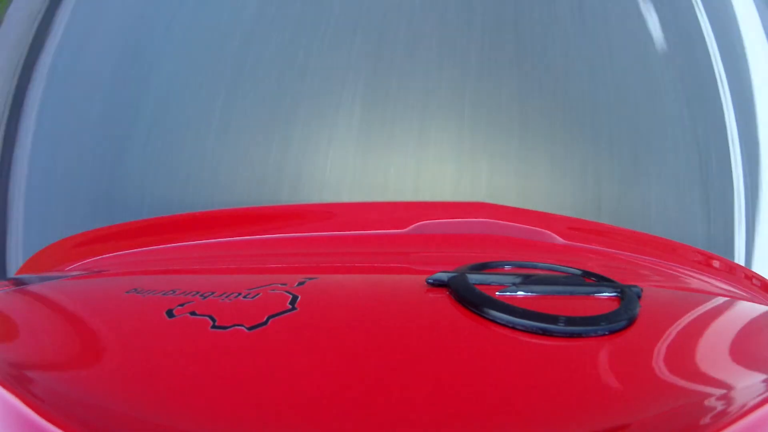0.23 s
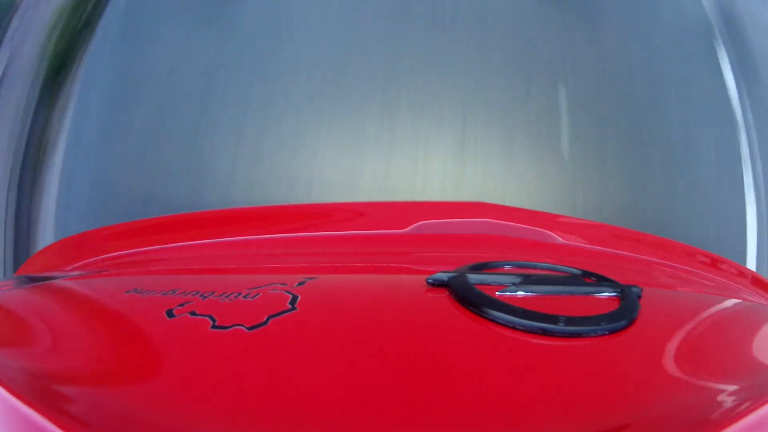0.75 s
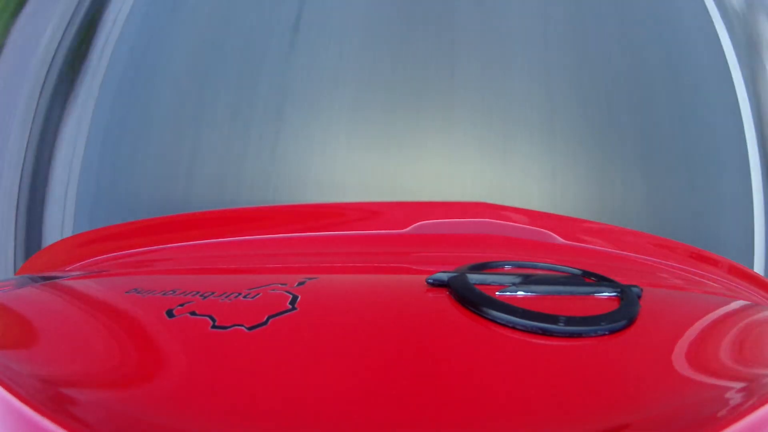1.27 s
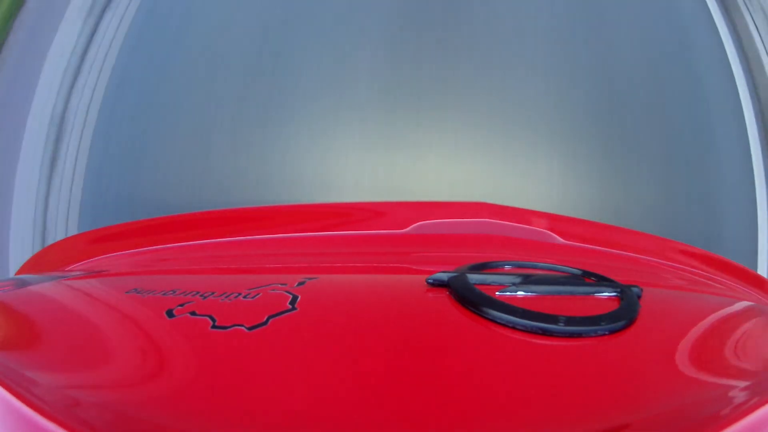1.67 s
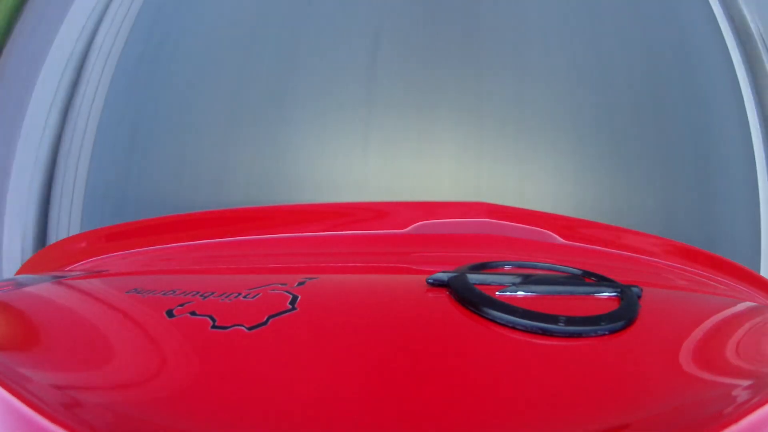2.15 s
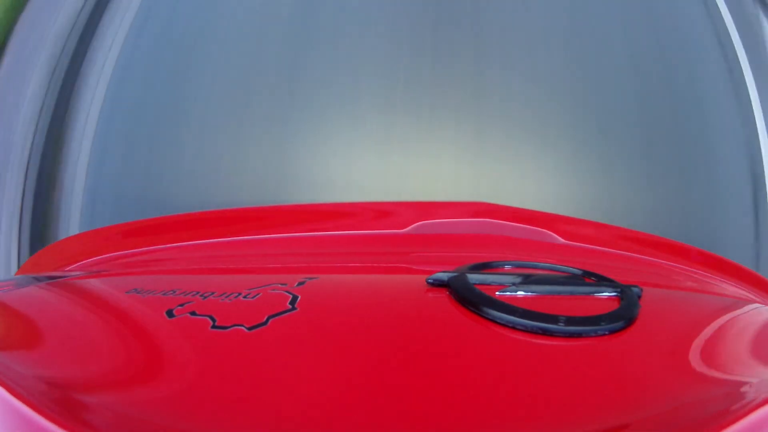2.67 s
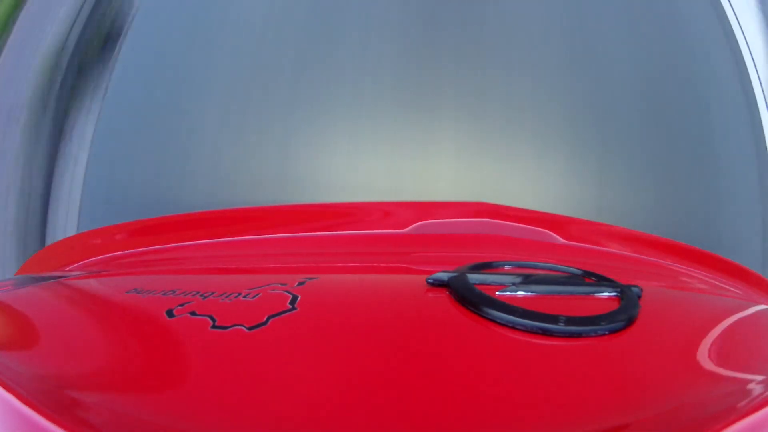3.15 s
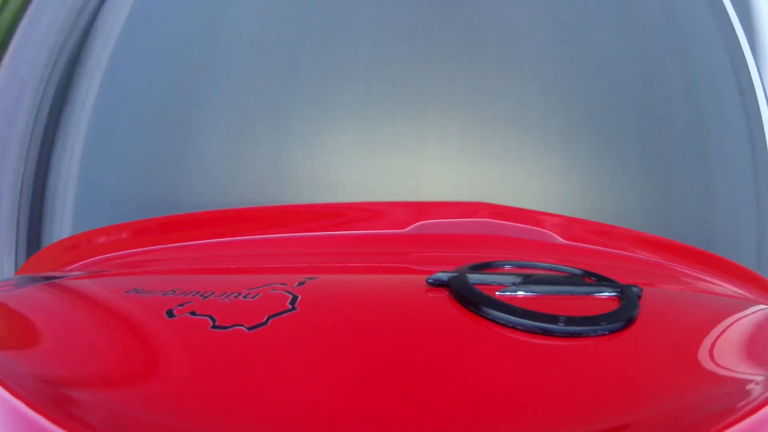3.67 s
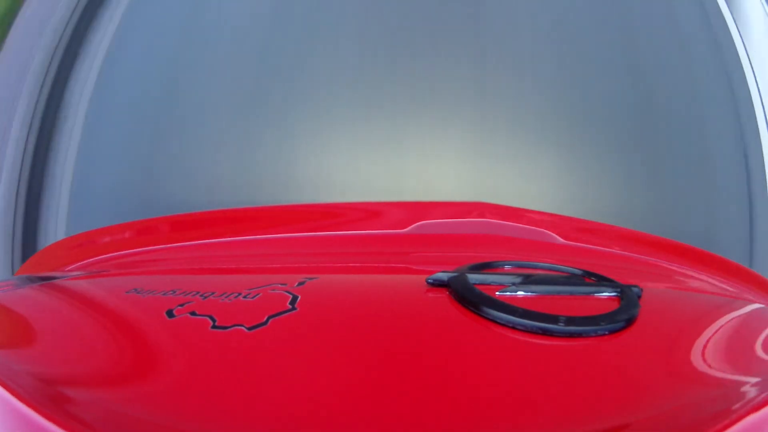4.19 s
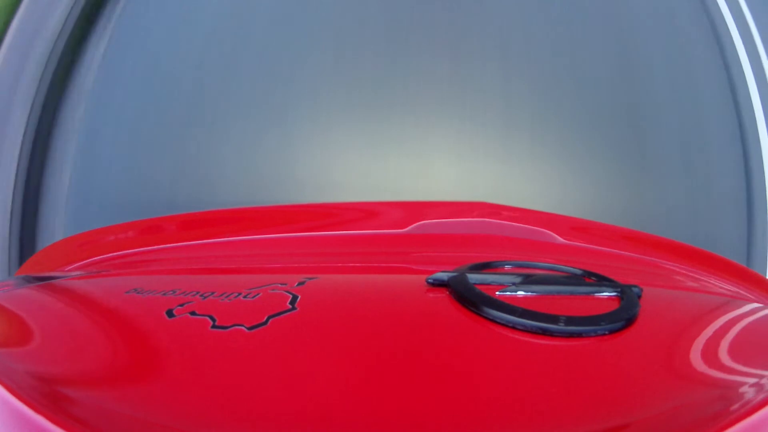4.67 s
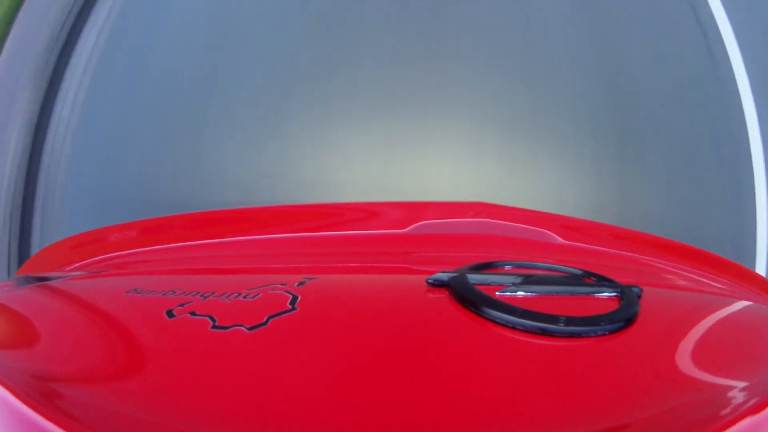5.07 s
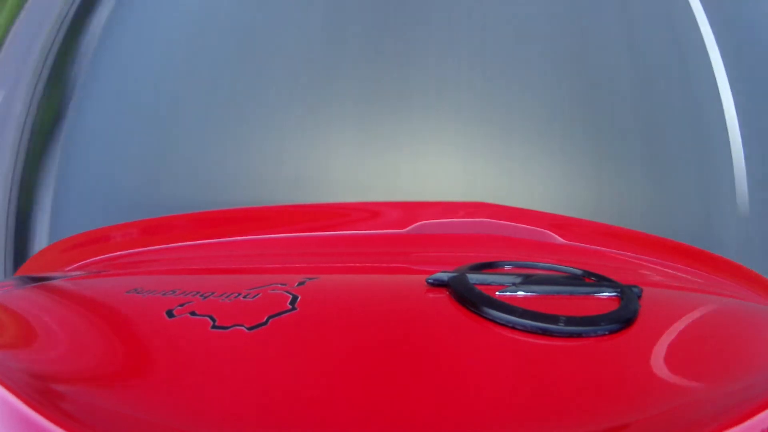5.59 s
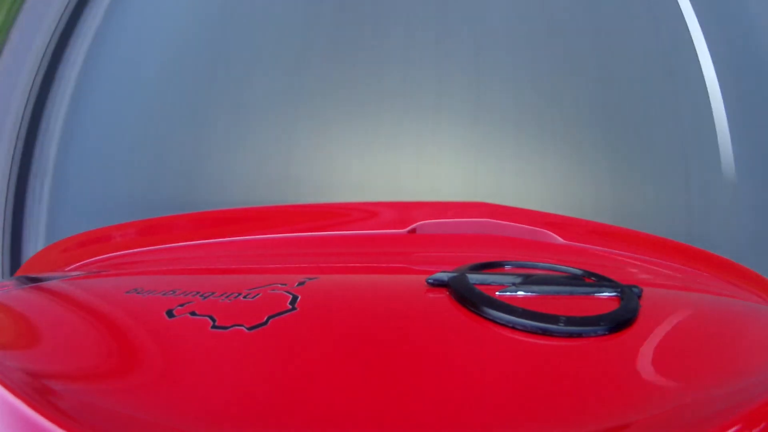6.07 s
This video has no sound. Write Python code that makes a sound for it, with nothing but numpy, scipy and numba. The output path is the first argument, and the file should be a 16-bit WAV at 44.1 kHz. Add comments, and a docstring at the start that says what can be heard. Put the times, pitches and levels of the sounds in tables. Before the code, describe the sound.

A small turbocharged four-cylinder drones low, climbs steadily to a raspy full-throttle howl, then lifts off with a thump and rattle.

```python
"""The exhaust of a small turbocharged four-cylinder drones through one full-throttle pull, then a coast.
Firing orders coloured by silencer and pipe make the drone and growl; each firing also rasps and puffs gas.
The wastegate roars, the turbo whistles faintly, tyres and wind give shaped noise, and a damp patch hisses.
At the tail, a loose camera mount rings when knocked and low thumps shudder.
The right microphone is hotter than the left, until a limiter on each side holds both to one ceiling."""
import sys
import numpy as np
from scipy import signal
from scipy.fft import rfft, irfft, next_fast_len
from scipy.io import wavfile
from scipy.ndimage import uniform_filter1d
from numba import njit

SR = 44100
rng = np.random.default_rng(int(sys.argv[2]) if len(sys.argv) > 2 else 0)


def put_to_file(sound):
    """Save the sound as 16-bit audio at rate SR, in the file named by the first command-line argument."""
    columns = np.atleast_2d(sound).T  # one column per channel
    safe = np.clip(columns, -1, 1)
    whole_steps = np.round(safe * 32767)
    wavfile.write(sys.argv[1], SR, whole_steps.astype(np.int16))


N = 279594
TIME = np.arange(N) / SR  # seconds

# Engine speed. Each row: time in seconds, firing rate in Hz.
FIRING_RATE = [(0, 57.1), (.3, 56.84), (.75, 62.65), (1.2, 69.27), (1.6, 76.27), (2, 84.46), (2.4, 93.48),
               (3, 110.3), (3.6, 130.9), (4.1, 148), (4.6, 164.9), (4.85, 171), (5.06, 173.6),
               (5.26, 166.8), (5.6, 156), (5.95, 149), (6.1, 140.4), (6.34, 121.7)]
# Driver and turbo. Each row: time in seconds, throttle 0-1, boost 0-1, wastegate opening 0-1.
ENGINE_LOAD = [(0, 0.62, 0, 0), (.2, .7, 0.2, 0.08), (1.25, 0.86, 0, 0.07), (1.5, 1, 0.04, 0.04),
               (2.25, 0.93, 0.1, 0.13), (2.6, 1, 0.71, 0), (2.95, 0.89, 0.98, 0), (3.2, 0.92, 0.95, 0.56),
               (4.2, 0.92, 1, 0.94), (4.65, 0.84, 0.59, 1), (5.1, 0.87, 0.68, 0.56), (5.2, 0.56, 0.01, 0),
               (5.8, 0.12, 0, 0.05)]
REF_HZ = 100  # firing rate at which the level laws start
# The exhaust booms as the firing rate passes this one; near the top the higher orders howl.
BOOM_HZ, BOOM_WIDTH_HZ = 78, 3.8
HOWL_HZ, HOWL_WIDTH_HZ, HOWL_DB = 165, 8, 12.5

# Noise spectra, relative because each noise is scaled to rms 1. Each row: frequency in Hz, dB per Hz.
WIND_SPECTRUM = [(15, -11), (32, 7.5), (60, 0.5), (120, -2), (250, -10.5), (500, -26), (1200, -53.5)]
TYRE_SPECTRUM = [(100, 1.5), (300, -1.5), (520, -4), (800, 0), (1080, 3.5), (1450, -3.5), (2100, -20.5),
                 (3000, -26.5), (4100, -30.5), (5800, -47), (9000, -60.5), (15000, -63.5)]
SPRAY_SPECTRUM = [(1500, -29.5), (2800, 2), (4000, 1.5), (5600, -5.5), (7000, -7.5), (10000, -4.5),
                  (13000, -8.5), (15000, -7)]
GAS_SPECTRUM = [(40, -9), (150, -8), (380, 7), (580, -2), (780, 1), (1300, -27.5), (2200, -10.5),
                (2650, -18), (4100, -21.5), (4500, -22.5), (5000, -23.5), (7600, -33), (8800, -39),
                (15000, -40.5)]

# Air and road laws. Each row: dB at the road speed of REF_HZ, dB per doubling of speed.
WIND_LAW = (-28, 8)
TYRE_LAW = (-28, 10)
GUST_S, GUST_LENGTH_S, GUST_DB = 0.57, .15, 4  # one stronger eddy
# The tyres hit a damp patch and dry off.
DAMP_S, DAMP_DB, WETTING_DB_PER_S, DRYING_DB_PER_S = .7, -53, 130, 6.5
# Grit flung off the tread. Each row: time in seconds, level in dB, centre in Hz, width in Hz, length in seconds.
GRIT_SPITS = [(0.457, -32, 1000, 1500, .002), (0.643, -58, 6980, 4000, .006),
              (0.719, -46.5, 4000, 3500, 0.017), (0.762, -56, 6000, 4000, 0.0055),
              (0.822, -58, 11000, 6000, 0.0053), (.884, -50, 5800, 2500, .005),
              (.885, -54, 11400, 6000, 0.0045), (.958, -44.5, 11000, 4500, 0.0034),
              (1.074, -58, 5500, 1400, 0.051), (1.22, -60, 9700, 1800, .008),
              (1.322, -52, 4200, 800, 0.012)]
# Dull thumps, the second as the throttle snaps shut.
# Each row: start in seconds, level in dB, frequency in Hz, 60 dB decay time in seconds.
TAIL_THUMPS = [(.452, -31.5, 45, .15), (5.219, -5, 51, 0.21)]

# Hard knocks of the camera mount. Each row: time in seconds, relative level in dB.
MOUNT_KNOCKS = [(5.215, -20), (5.227, -17), (5.2408, -21), (5.4196, -11.5), (5.426, -17), (5.4548, -13.5),
                (5.471, -18), (5.4761, -20), (5.7384, -23.5), (6.1784, -23), (6.2128, -24), (6.2698, -22),
                (6.3304, -19.5)]
# Modes of the mount. Each row: frequency in Hz, 60 dB decay time in seconds, relative level in dB.
MOUNT_MODES = [(3280, 0.0044, 0.5), (4400, 0.0063, -0.5), (5470, 0.019, -2), (6360, 0.0053, 2),
               (7400, 0.016, -3), (9000, 0.0089, -0.5), (9640, 0.013, -4), (10800, 0.00375, -7),
               (13400, .003, -11)]
# Bouts of lighter chatter that die away.
# Each row: start in seconds, length in seconds, relative level in dB at the start.
CHATTER_BOUTS = [(5.497, .21, -26.5), (6.221, 0.08, -29)]
CHATTER_GAP_S, CHATTER_FADE_DB_PER_S, CHATTER_SCATTER_DB = 0.014, 55, 3
BUZZ_DB = -54  # the mount's buzz under load, relative to the first order

# The turbo spools up: whistle from rest to full speed, heard best halfway.
TURBO_REST_HZ, TURBO_FULL_HZ, SPOOL_S, SPOOL_LENGTH_S, TURBO_DB = 6700, 12500, 0.97, 0.25, -61
# Gas through the wastegate. Each row: centre in Hz, width in Hz, dB fully open, power of the opening.
BYPASS_BANDS = [(1332, 800, -28.5, 0.94), (4404, 6000, -40, 2.8)]

# Growl, rasp and gas laws. Each row: dB at REF_HZ and full throttle, dB per octave of revs,
# dB with the throttle shut, dB at full boost, dB with the wastegate open, dB in the boom.
GROWL_LAW = (-31, .5, -12, 6.5, -5, 8)
RASP_LAW = (-31, 9.5, -10.5, -3, 9, 1.5)
GAS_LAW = (-38.5, 9.5, -9, 4.5, 7.5, -2.5)
# Cylinder imbalance. The row: dB relative to the first order, dB with the wastegate open.
LOPE_LAW = (-32, 9.5)
# Resonances of the tailpipe. Each row: frequency in Hz, width in Hz, relative level in dB.
TAILPIPE_MODES = [(756, 85, 5.5), (1035, 83, 3), (1515, 200, -10), (1654, 110, -7), (1872, 150, -8.5),
                  (2230, 210, -17.5), (2940, 110, -23), (4020, 130, -31.5), (5070, 170, -37),
                  (7300, 1300, -48)]
# Response of the exhaust pipe. Each row: frequency in Hz, gain in dB.
PIPE_RESPONSE = [(30, -16), (105, -4.5), (175, 5), (240, -2), (330, 5), (390, -5.5), (460, -9), (600, -19),
                 (740, -9), (830, 1), (910, -14.5), (1020, -2), (1600, -2)]
# Standing waves of the silencer, met by the four lowest orders. Each row: frequency in Hz, gain in dB.
SILENCER_RESPONSE = [(70, -13), (100, -5), (125, -4), (155, -1.6), (195, -0.15), (230, 2.5), (262, -4.5),
                     (315, 4), (365, 5), (420, -4), (470, -0.5), (570, -11), (700, -10)]
# Firing orders 1 to 4, ahead of the silencer. Each row: dB at full throttle,
# dB with the throttle shut, dB at full boost, dB in the boom.
LOW_ORDER_LAWS = [(-10.6, -7, 5.2, .5), (-12.6, -23, 1.4, 2.5), (-27.5, -17, 11.8, 1), (-29.8, -11, 4, 11)]
# The hum wavers around and after the lift-off; the end values hold outside.
# Each row: time in seconds, dB added to the first order.
HUM_WAVER = [(5.09, 6.5), (5.19, -15), (5.26, 5), (5.37, 0), (5.6, 4), (5.68, -2.5), (5.82, -1), (5.95, 5),
             (6.34, -2)]

RIGHT_DB = 4.1  # right over left, ahead of the limiters
WHINE_HZ, WHINE_DB = 13150, -62.5  # the camera's electronics
TOP_HZ = 15200  # upper band edge


def undb(db):
    """Amplitude ratio: 20 dB is a factor of ten."""
    return 10 ** (np.asarray(db) / 20)


def curves(table):
    """Linear interpolation in time of each column of a table."""
    s, *columns = np.transpose(table)
    return [np.interp(TIME, s, c) for c in columns]


def law(row, *controls):
    """Additive decibel law: a base level plus so many dB per unit of each control."""
    return row[0] + sum(db * control for db, control in zip(row[1:], controls))


def bell(x, centre, width):
    """Gaussian bump of height 1; the width is its standard deviation."""
    return np.exp(-.5 * ((x - centre) / width) ** 2)


def response(points, hz):
    """Frequency response: gain interpolated in dB over log frequency."""
    f, db = np.transpose(points)
    return undb(np.interp(np.log(np.maximum(hz, 1)), np.log(f), db))


def noise(points):
    """Spectral shaping of white noise, scaled to rms 1."""
    size = next_fast_len(N)
    hz = np.arange(size // 2 + 1) * SR / size
    spectrum = rfft(rng.standard_normal(size)) * response(points, hz)
    x = irfft(spectrum, size)[:N]
    return x / x.std()


def spread(points, side_db):
    """Partial coherence: noise common to two close ports plus a small part in opposite sign."""
    return noise(points) + undb(side_db) * noise(points) * np.array([[1], [-1]])


def walk(rate):
    """Slow random modulation: values held 1 / rate s, smoothed twice; standard deviation 1."""
    k = max(int(SR / rate), 1)
    steps = np.repeat(rng.standard_normal(N // k + 1), k)
    x = uniform_filter1d(uniform_filter1d(steps, k), k)[:N]
    return x / x.std()


def narrow_band(hz, width):
    """Quadrature modulation: two random envelopes make noise about a fixed or moving centre."""
    phase = 2 * np.pi * np.cumsum(hz * np.ones(N)) / SR
    return walk(width) * np.cos(phase) + walk(width) * np.sin(phase)


def wind():
    """Turbulence: eddies behind the car buffet the microphones."""
    gusts = spread(WIND_SPECTRUM, side_db=-18)
    return gusts * undb(2 * walk(14))


def tyres():
    """Contact noise: tread roar flutters with the road surface."""
    return spread(TYRE_SPECTRUM, side_db=-46.5) * undb(1.0 * walk(35))


def spray(spurt_db=3):
    """Droplet noise: fine mist leaves the tread in quick spurts, with brief bands of grit."""
    wetting_db = (DAMP_S - TIME) * WETTING_DB_PER_S
    drying_db = (TIME - DAMP_S) * DRYING_DB_PER_S
    wet_db = DAMP_DB - np.maximum(wetting_db, drying_db)
    mist = spread(SPRAY_SPECTRUM, side_db=-23) * undb(wet_db + spurt_db * walk(160))
    grit = sum(undb(db) * bell(TIME, s, length) * narrow_band(hz, width)
               for s, db, hz, width, length in GRIT_SPITS)
    return mist + grit


def thumps():
    """Damped oscillation: low, quickly decaying shudders of the tail."""
    out = 0
    for s, db, hz, t60 in TAIL_THUMPS:
        t = np.maximum(TIME - s, 0)
        out = out + undb(db - 60 * t / t60) * np.sin(2 * np.pi * hz * t)
    return out


def chatter(count=24):
    """Decaying impact train: light ticks at uneven gaps fade through each bout, as (s, dB)."""
    ticks = []
    for start, length, db in CHATTER_BOUTS:
        ages = CHATTER_GAP_S * (np.arange(count) + rng.random(count))
        levels = db - CHATTER_FADE_DB_PER_S * ages + CHATTER_SCATTER_DB * rng.standard_normal(count)
        ticks += [(start + age, level) for age, level in zip(ages, levels) if age < length]
    return ticks


def mount_ring(t):
    """Modal ringing: damped sines, each slightly off its nominal pitch."""
    ring = 0
    for f, t60, db in MOUNT_MODES:
        cycles = f * (1 + 0.025 * rng.standard_normal()) * t + rng.random()
        ring = ring + undb(db - 60 * t / t60) * np.sin(2 * np.pi * cycles)
    return ring


def rattle(level_db=-11, bounce_s=0.0042, bounce_db=-9, crack_db=-5, crack_s=0.0011):
    """Impact excitation: the loose mount cracks and rings, and each tick bounces twice."""
    out, t = np.zeros(N + SR), np.arange(SR // 40) / SR
    for s, db in list(MOUNT_KNOCKS) + chatter():
        for bounce in range(3):  # the tick and its two bounces
            ring = mount_ring(t)
            crack = undb(crack_db) * np.exp(-t / crack_s) * np.gradient(rng.standard_normal(len(t)))
            start = int(s * SR)
            out[start:start + len(t)] += undb(db + level_db + bounce * bounce_db) * (ring + crack)
            s += bounce_s * (.5 + rng.random())
    return out[:N]


def buzz(phase, sharpness=9, scatter_db=3):
    """Forced vibration: the drone shakes the mount into a faint, uneven tick once per firing."""
    tick = np.exp(sharpness * (np.cos(phase) - 1))
    return spread(SPRAY_SPECTRUM, side_db=-15) * tick * undb(scatter_db * walk(100))


def turbo(width_hz=1600, flutter_db=3):
    """Rotor tone: a faint, ragged whistle climbs with the spooling turbine."""
    spool = (1 + np.tanh((TIME - SPOOL_S) / (1.3 * SPOOL_LENGTH_S))) / 2
    hz = TURBO_REST_HZ + (TURBO_FULL_HZ - TURBO_REST_HZ) * spool
    level = undb(TURBO_DB + flutter_db * walk(90)) * bell(TIME, SPOOL_S, SPOOL_LENGTH_S)
    return level * narrow_band(hz, width_hz)


def bypass(wastegate):
    """Flow noise: a roar and a bright hiss grow as the wastegate opens."""
    return sum(undb(db) * wastegate ** power * narrow_band(hz, width)
               for hz, width, db, power in BYPASS_BANDS)


def gas(phase):
    """Modulated turbulence: gas leaves the tailpipe in one uneven puff per firing."""
    puff = np.exp(.45 * np.cos(phase)) * undb(1.2 * walk(220))
    return spread(GAS_SPECTRUM, side_db=-22.5) * puff / np.sqrt(np.mean(puff ** 2))


def tailpipe(x):
    """Resonance: a sum of complex modes of alternating sign filters the input; rms 1."""
    size = next_fast_len(N)
    hz = np.arange(size // 2 + 1) * SR / size + 1
    modes = 0
    for k, (f, width, db) in enumerate(TAILPIPE_MODES):
        peak = undb(db) / (1 + 2j * (hz - f) / width)
        modes = modes + peak * (2 * f / (hz + f)) ** 2 * (-1) ** k
    low_cut = hz ** 2 / (hz ** 2 + 700 ** 2)
    y = irfft(rfft(x, size) * modes * low_cut, size)[:N]
    return y / y.std()


def rasp(phase, revs, sharpness=0.52, scatter_db=-0.2,
         front_db=-6, front_db_per_octave=-6, front_sharpness=70):
    """Pulsed excitation: a pressure front and a burst of gas at each firing ring the tailpipe."""
    size = undb(scatter_db * walk(100))
    burst = np.exp(sharpness * np.cos(phase)) * rng.standard_normal(N)
    front = np.exp(front_sharpness * (np.cos(phase + .1 * walk(150)) - 1))
    front_gain = undb(front_db + front_db_per_octave * revs)
    return tailpipe(burst * size) + front_gain * tailpipe(front * size)


def lope(phase, hz, waver_db=2, rise_db_per_order=0.26):
    """Subharmonics: four unequal cylinders add lines at quarter orders."""
    out = 0
    for k in np.arange(2, 20) / 4:
        if k % 1:  # whole orders belong to the drone
            lag = 2 * np.pi * rng.random() + 0.68 * walk(20)
            gain = undb(rise_db_per_order * k + waver_db * walk(13)) * response(PIPE_RESPONSE, k * hz)
            out = out + gain * np.cos(k * phase + lag)
    return np.sqrt(2) * out


def growl(phase, hz, db_per_order=-2.5, waver_db=2):
    """Harmonics through resonances: firing orders 5 to 10 swell as they pass the pipe's peaks."""
    out = 0
    for k in range(5, 11):
        gain = undb(db_per_order * (k - 5) + waver_db * walk(13)) * response(PIPE_RESPONSE, k * hz)
        out = out + gain * np.cos(k * phase)
    return np.sqrt(2) * out


def drone(phase, hz, orders_db, shake=0.069):
    """Fourier synthesis: four firing orders, double-humped pulses leaning into a sawtooth with revs."""
    lean = np.interp(hz, [76, 92], [0, 1])
    tone = 0
    for k, db in enumerate(orders_db, 1):
        lead = np.pi / 2 * (lean if k < 3 else 1)
        tone = tone + undb(db) * np.cos(k * phase + lead)
    return np.sqrt(2) * tone * (1 + shake * walk(130))


def scene():
    """Superposition: exhaust, road, wind and mount at the two ports, following revs and load."""
    hz, = curves(FIRING_RATE)
    throttle, boost, wastegate = np.clip(curves(ENGINE_LOAD), 0, 1)
    boom = bell(hz, BOOM_HZ, BOOM_WIDTH_HZ)
    revs = np.log2(hz / REF_HZ)  # octaves
    speed = np.maximum.accumulate(revs)  # the car rolls on when the revs drop
    engine = (revs, 1 - throttle, boost, wastegate, boom)
    phase = np.pi + 2 * np.pi * np.cumsum(hz) / SR + 0.0034 * walk(90)

    air_db = law(WIND_LAW, speed) + GUST_DB * bell(TIME, GUST_S, GUST_LENGTH_S)
    air = undb(air_db) * wind()
    road = undb(law(TYRE_LAW, speed)) * tyres() + spray()

    orders_db = []
    for k, row in enumerate(LOW_ORDER_LAWS, 1):
        silencer_db = 20 * np.log10(response(SILENCER_RESPONSE, k * hz))
        orders_db.append(law(row, 1 - throttle, boost, boom) + silencer_db)
    orders_db[0] = orders_db[0] + curves(HUM_WAVER)[0]
    hum_db = orders_db[0]
    growl_db = law(GROWL_LAW, *engine) + HOWL_DB * throttle * bell(hz, HOWL_HZ, HOWL_WIDTH_HZ)

    exhaust = drone(phase, hz, orders_db) + undb(growl_db) * growl(phase, hz)
    exhaust = exhaust + undb(law(RASP_LAW, *engine)) * rasp(phase, revs)
    exhaust = exhaust + undb(law(GAS_LAW, *engine)) * gas(phase)
    # the cylinders differ most with the wastegate open
    exhaust = exhaust + undb(hum_db + law(LOPE_LAW, wastegate)) * lope(phase, hz)

    mount_buzz = throttle * undb(hum_db + BUZZ_DB) * buzz(phase)
    car = exhaust + bypass(wastegate) + road + air + thumps() + turbo() + mount_buzz
    # the rattle travels through the housing to both ports alike
    return car * undb(RIGHT_DB * np.array([[-.5], [.5]])) + rattle()


@njit
def follow_peaks(x, release):
    """Peak detection: the envelope jumps up at once and sinks exponentially."""
    out, e = np.empty(len(x)), 0.
    for i in range(len(x)):
        e = max(abs(x[i]), e * (1 - release))
        out[i] = e
    return out


def record(dry, ceiling=0.95, release_s=0.036, hiss_db=-59):
    """Limiting: each channel is held down and clipped; hiss and a thin whine join, then a low-pass."""
    peaks = np.array([follow_peaks(x, 1 / (release_s * SR)) for x in dry])
    gain = uniform_filter1d(np.minimum(1, ceiling / (peaks + 1e-9)), size=31)
    whine = np.sqrt(2) * undb(WHINE_DB) * np.sin(2 * np.pi * WHINE_HZ * TIME)
    hiss = undb(hiss_db) * rng.standard_normal(dry.shape)
    out = np.clip(dry * gain, -1, 1) + whine + hiss
    low_pass = signal.ellip(8, .2, 70, TOP_HZ, fs=SR, output="sos")
    return signal.sosfilt(low_pass, out)


dry = scene()
out = record(dry)
put_to_file(out)
```